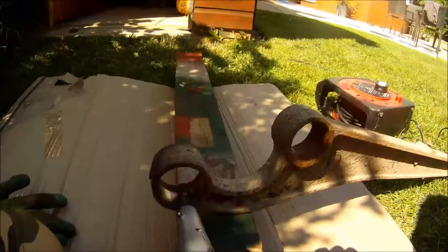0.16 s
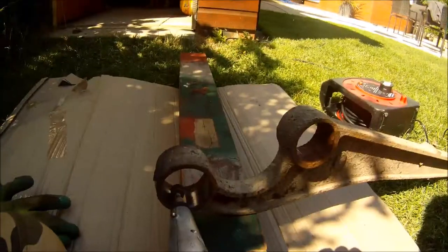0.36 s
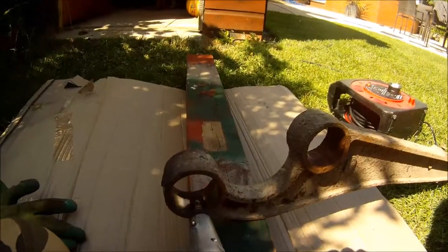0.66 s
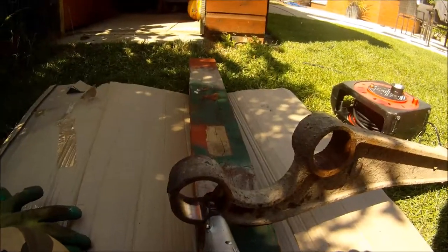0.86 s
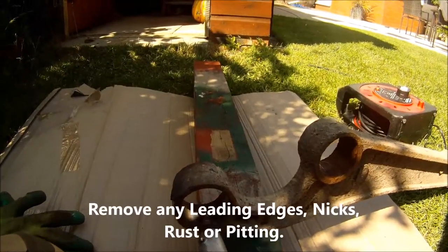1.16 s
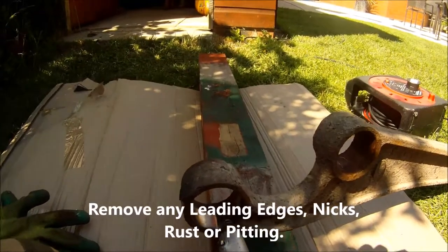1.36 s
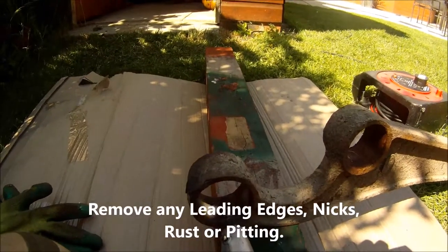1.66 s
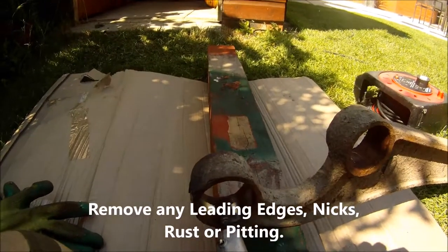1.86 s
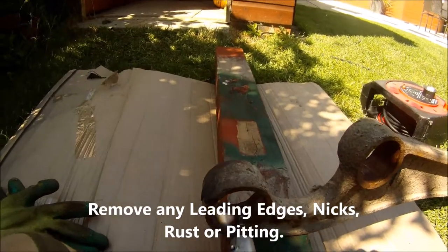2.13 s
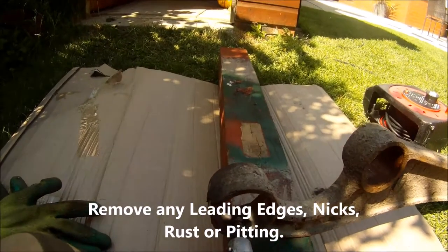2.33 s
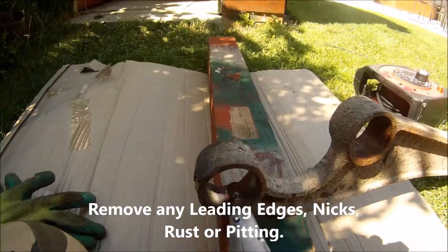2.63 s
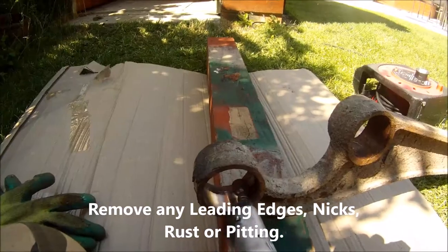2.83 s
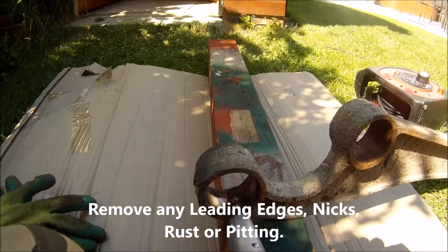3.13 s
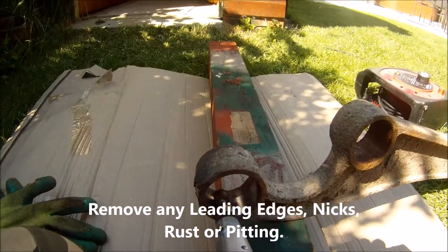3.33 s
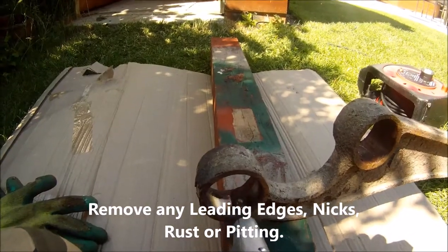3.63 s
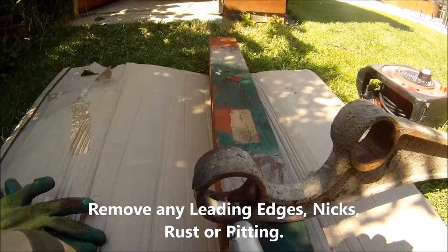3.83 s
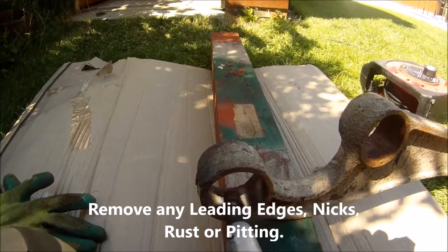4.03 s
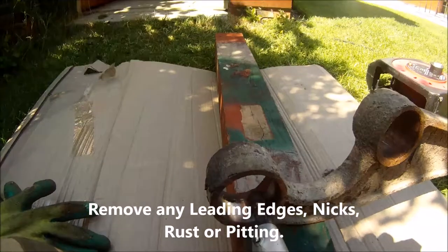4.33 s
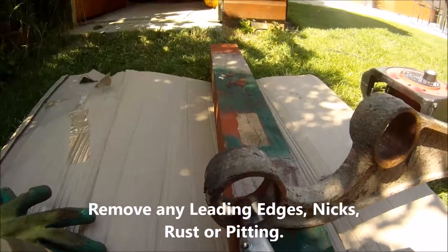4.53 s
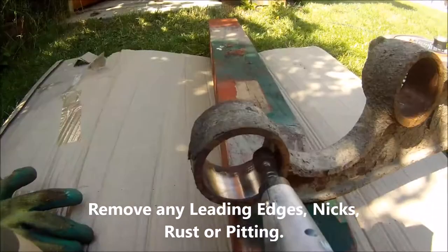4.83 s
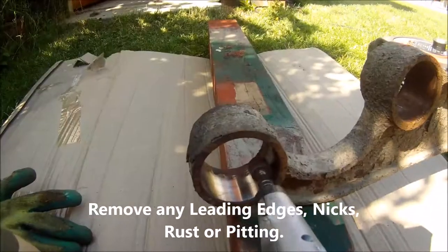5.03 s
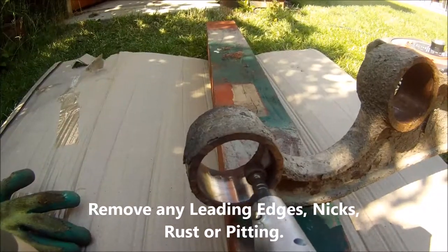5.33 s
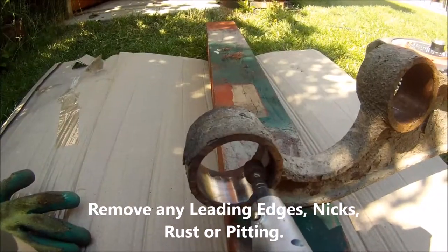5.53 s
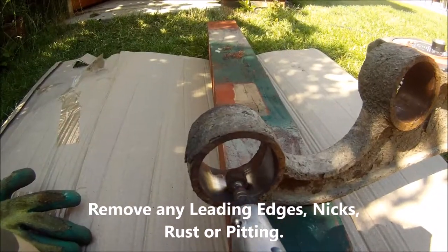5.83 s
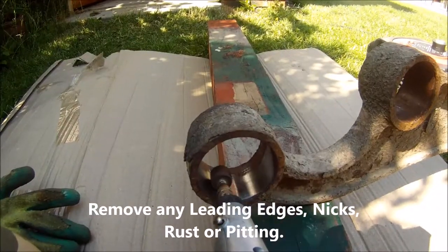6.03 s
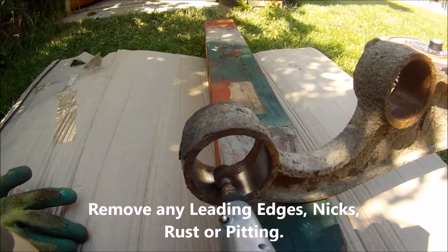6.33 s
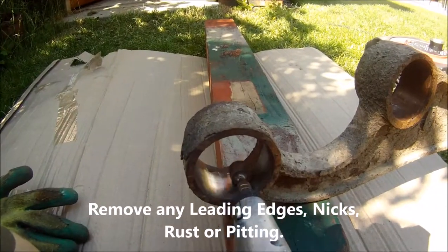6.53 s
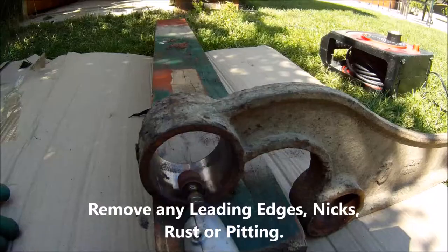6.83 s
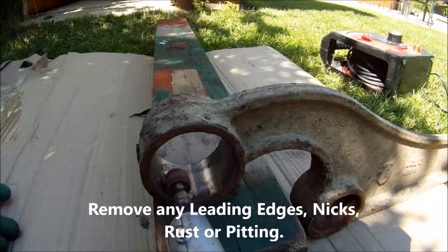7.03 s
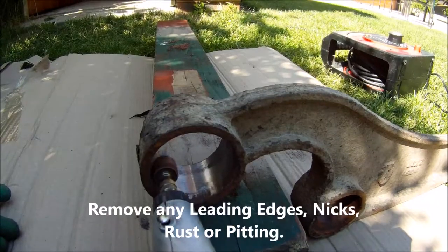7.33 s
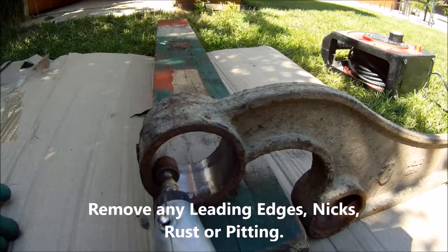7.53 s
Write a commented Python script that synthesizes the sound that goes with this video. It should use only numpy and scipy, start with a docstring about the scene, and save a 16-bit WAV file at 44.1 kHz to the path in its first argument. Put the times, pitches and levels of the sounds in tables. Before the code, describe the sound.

Outdoors, close to the microphone, an electric drill drives a small abrasive wheel inside a rusty steel bore. From the start it makes a rough, buzzing scrape with gritty hiss, its pitch sagging until about 1.2 s, then wavering upward by 1.9 s. Around 2.1-2.3 s it skips and knocks, sputters and lifts away, leaving faint yard wash and a tiny total dropout near 2.5 s. Grinding resumes at once, rasping and wavering, dipping low around 3.3 s and swelling near 4.4 s. At 4.75 s the sound shifts lower and duller with a wind thump, labouring to its lowest pitch near 5.7 s. Hard metallic knocks clatter from 5.7 to 6.1 s, then the rasp strengthens and rises. The casting and arm ring throughout these passes. After another brief dropout at 6.7 s, the wheel runs much quieter, higher and smoother to the end at about 7.7 s, under low wind buffets, strongest near 7.0 s.

```python
"""Outdoors, an electric drill spins a small abrasive wheel inside a rusty steel bore, with two short silences.
Each turn drags nearly the same rough rim over the steel; its high spot strikes once, and loose grit hisses.
Short knocks crack out, and the casting and its long arm ring as resonances. Noise shaped into wind buffets the
microphone over a faint yard wash. Samples held in steps mirror the spectrum into the treble."""
import sys
import numpy as np
from scipy.fft import rfft, irfft, next_fast_len
from scipy.io import wavfile
from scipy.ndimage import uniform_filter1d, map_coordinates

SR = 44100
rng = np.random.default_rng(int(sys.argv[2]) if len(sys.argv) > 2 else 0)


def materialize(psi):
    """Save the field psi as 16-bit PCM at rate SR to the path in sys.argv[1].

    A 1-D psi becomes a single channel; in a 2-D psi each row is a channel.
    """
    bounded = np.clip(np.atleast_2d(psi).T, -1, 1)
    quanta = np.round(bounded * 32767).astype(np.int16)
    wavfile.write(sys.argv[1], SR, quanta)


N = 338247
T = np.arange(N) / SR  # time in s


def amp(db):
    """dB to gain."""
    return 10 ** (np.asarray(db) / 20)


def unit(x):
    """x scaled to rms 1."""
    return x / np.sqrt(np.mean(x ** 2) + 1e-20)


def along(points, hz):
    """Read (hz, value) points on a log frequency axis."""
    f, v = np.transpose(points)
    return np.interp(np.log(hz + 1), np.log(f + 1), v)


def filtered(x, response):
    """Shape x by a complex response of frequency, padded so that tails do not wrap round."""
    m = next_fast_len(N + SR // 2)
    spectrum = rfft(x, m) * response(np.fft.rfftfreq(m, 1 / SR))
    return irfft(spectrum, m)[..., :N]


def causal(points):
    """A minimum-phase response along (hz, db) points: its sound starts only at the blow."""
    def response(hz):
        cepstrum = irfft(np.log(amp(along(points, hz)) + 1e-6))
        half = len(cepstrum) // 2
        cepstrum[1:half] *= 2
        cepstrum[half + 1:] = 0
        return np.exp(rfft(cepstrum))
    return response


def below(hz):
    """A steep zero-phase low-pass."""
    return lambda f: 1 / (1 + (f / hz) ** 10)


def mode(f, hz, width_hz):
    """A causal resonance of peak gain 1; the narrower it is, the longer it rings."""
    return 1j * f * width_hz / (hz * hz - f * f + 1j * f * width_hz)


def wobble(rate):
    """A smooth random curve, rate knots a second."""
    return map_coordinates(rng.standard_normal(int(N * rate / SR) + 4), [T * rate])


def rim(turns, spot, life_turns, uneven_db, size=160):
    """The rim's bumps, read by angle: one high spot, or force spread round the turn in a pattern that slowly wears."""
    whole = np.arange(int(turns[-1]) + 2)
    harmonics = size // 2 + 1
    knots = rng.standard_normal((2, int(200 * T[-1] / life_turns) + 4, harmonics))
    grid = np.meshgrid(whole / life_turns, np.arange(harmonics), indexing="ij")
    lag, strength = (map_coordinates(k, grid) for k in knots)  # per turn and harmonic
    # coarse shape and fine grain vary least
    strength = strength * np.interp(grid[1], [4, 12, 20, 32], [.3, 1, 1, .55])
    # harmonics in step make one high spot; scattered phases spread the force
    spread = 3 * (1 - np.interp(whole, turns, spot))
    bumps = -irfft(amp(uneven_db * strength) * np.exp(1j * spread[:, None] * lag), size)
    bumps = np.roll(bumps, size // 2, axis=1)
    return unit(map_coordinates(bumps, [turns - .5, turns % 1 * size], mode="grid-wrap"))


# wheel speed, sagging as it is pressed home, one curve per list: time_s, speed_turns_per_s
SPEED = [
    [(0.04, 137.7), (0.09, 136.8), (0.14, 131.4), (0.18, 130.8), (0.32, 124.5), (0.44, 128.3),
     (0.48, 128.1), (0.59, 132.1), (0.68, 128.4), (0.74, 128.2), (0.8, 124.9), (0.85, 124.3), (1.01, 118.4),
     (1.06, 120.3), (1.1, 119.9), (1.17, 112.7), (1.2, 111.3), (1.24, 111.6), (1.3, 118.4), (1.34, 121.2),
     (1.37, 120.8), (1.42, 117), (1.48, 115.4), (1.57, 119.2), (1.7, 117.7), (1.75, 118.9), (1.79, 122.4),
     (1.87, 134), (1.89, 134.4), (1.95, 132), (2.02, 137.1), (2.075, 138), (2.11, 131.4), (2.17, 134.2),
     (2.2, 131), (2.23, 137), (2.3, 138)],
    [(2.51, 127.3), (2.57, 124), (2.63, 113), (2.65, 110.1), (2.66, 110.9), (2.71, 122.4), (2.76, 119),
     (2.82, 118.4), (2.89, 114.2), (2.95, 117.2), (3.03, 114.3), (3.07, 114.8), (3.13, 112.8),
     (3.23, 104.6), (3.26, 97.2), (3.3, 93.5), (3.35, 94.4), (3.4, 93.5), (3.54, 100.5), (3.59, 107.1),
     (3.65, 112.9), (3.71, 115.1), (3.76, 115.4), (3.83, 113.4), (3.9, 116.9), (4.02, 113.2), (4.07, 108.9),
     (4.15, 105.9), (4.2, 107.6), (4.39, 121.7), (4.48, 117.7), (4.54, 116.1), (4.59, 117.9), (4.62, 117.3),
     (4.67, 114.6), (4.735, 113.4)],
    [(4.745, 101), (4.766, 98.9), (4.822, 102.3), (4.85, 102.8), (4.888, 100.6), (4.93, 96.6), (4.95, 95.5),
     (5.018, 105.1), (5.048, 105.2), (5.104, 101.9), (5.146, 101.9), (5.17, 101.1), (5.212, 94.3),
     (5.296, 99.3), (5.344, 97.9), (5.386, 94.5), (5.432, 94.1), (5.462, 92.2), (5.512, 87.6),
     (5.564, 87.7), (5.648, 88.6), (5.672, 86.6), (5.71, 81.6), (5.724, 81.1), (5.8, 85.5), (5.828, 88.2),
     (5.874, 91), (5.912, 96.4), (5.944, 99.4), (5.978, 100.9), (6.102, 98.4), (6.16, 99.2), (6.252, 103),
     (6.314, 106.6), (6.456, 106), (6.498, 103.1), (6.594, 99.5), (6.68, 99.4)],
]
# wheel speed under light pressure: time_s, speed_turns_per_s
SPEED_LIGHT = [(6.713, 163.5), (6.755, 159.2), (6.803, 151.2), (6.863, 155.1), (6.891, 153.6),
               (7.021, 152.2), (7.083, 157.6), (7.111, 158.5), (7.143, 157.4), (7.223, 163.0),
               (7.369, 151.4), (7.399, 151.7), (7.511, 143.0), (7.575, 146.9), (7.601, 145.5),
               (7.67, 151.4)]
# scouring in each of five stretches: time_s, level_db, then treble rasp_db, body_db and drone_db
# relative to that level, and high_spot_share (0-1)
SCOURING = [
    [(0.04, -32, -1.5, -0.5, -3.5, 0.78), (0.3, -29, -7, -6.5, -9.5, 0.66),
     (0.4, -30.5, -5, -3.5, -6, 0.79), (0.5, -28.5, -8, -10.5, -15, 0.48),
     (0.76, -25, -10.5, -9, -14, 0.55), (1.06, -27, -6.5, -10, -12.5, 0.62),
     (1.24, -27.5, -7, -15, -8, 0.63), (1.36, -29, -7, -6, -9, 0.69), (1.66, -25.5, -5.5, -11, -11, 0.7),
     (1.9, -30, -2.5, -1, -5, 0.72), (1.97, -30.5, -4.5, -4, -5, 0.57), (2.05, -31, -5, -12, -5, 0.4),
     (2.11, -26.5, -5.5, -13, -5, 0.66), (2.19, -30.5, -5.5, -11, -8, 0.72)],
    [(2.51, -25.5, -7.5, -6.5, -15, 0.57), (2.66, -25.5, -4, -14, -12, 0.66),
     (2.75, -26.5, -8, -7.5, -16, 0.24), (2.95, -26, -6.5, -9.5, -16, 0.65), (3.05, -33.5, 0, -4, -13, 0.6),
     (3.15, -31, -1.5, -6, -15, 0.61), (3.23, -30.5, -4.5, -8, -10.5, 0.6),
     (3.38, -30, -2, -10.5, -5.5, 0.7), (3.53, -28, 1, -8, -5.5, 0.85), (3.8, -26, -8.5, -8, -13.5, 0.69),
     (4.09, -29, -2, -5, -7, 0.72), (4.22, -26.5, -4.5, -6, -7, 0.83), (4.41, -24, -7, -7.5, -14, 0.79),
     (4.735, -26, -4, -8.5, -9, 0.75)],
    [(4.742, -28, -7, -7, -7.5, 0.67), (4.8, -30, -5, -5.5, -5, 0.65), (4.97, -31, -2.5, -2.5, -9, 0.63),
     (5.13, -29.5, -4, -4.5, -4.5, 0.43), (5.3, -31.5, -1.5, -2.5, -15.5, 0.55),
     (5.35, -28.5, -6, -6.5, -6.5, 0.61), (5.58, -31, -3.5, -3, -9, 0.76), (5.8, -28.5, -6.5, -4, -9, 0.86),
     (6.04, -26, -5, -11.5, -3.5, .82)],
    [(6.05, -28.5, -1, -11, -3, 0.93), (6.18, -26.5, 2, -19, -8, 1), (6.27, -29, -1, -4, -4, 0.71),
     (6.35, -26, -3.5, -8, -9.5, 0.78), (6.52, -26, -6, -9, -4, 0.77), (6.68, -28, -4, -8, -7, 0.82)],
    [(6.713, -34.5, -15, -8, -3, 1), (7.0, -36.5, -11, -5, 0.5, 0.88), (7.15, -37, -7.5, -5, -2, 0.88),
     (7.32, -38, -8.5, -5.5, -2, 0.85), (7.5, -38.5, -13, -5, -1, 0.85), (7.67, -35, -17, -5, -4.5, 0.87)],
]
# balance of each stretch: whine_db (relative to level), casting_ring_db
CONTACT = [(-10.5, -1.5), (-10.5, 0.5), (-12, -7), (-10.5, -1.5), (-3, -42)]
# the 2-3 kHz edge: time_s, edge_db (relative to level)
EDGE = [(0.04, -8), (0.3, -3.5), (0.65, -13.5), (0.88, -13), (1.1, -7), (1.7, -7), (1.9, -9.5), (2.2, -9.5),
        (2.58, -11), (2.9, -12.5), (3.1, -8), (3.4, -10), (4.2, -8.5), (4.72, -12.5), (5.0, -10.5),
        (5.5, -12), (6.1, -5.5), (6.35, -12.5), (6.55, -4.5), (6.72, -4.5), (7.67, -10)]
# roughness of each stretch at its top speed: rough (0-1)
ROUGH = [.04, .05, .11, .03, .03]
# the wheel skips: peak_s, added_rough (0-1), half_length_s (to 1/e)
JUDDERS = [(2.09, .15, .015), (2.15, .08, .05), (2.25, .55, .045), (5.85, .08, .1), (5.19, .07, .03),
           (5.72, .04, .1), (6.84, .07, .05), (7.05, .03, .02), (7.27, .05, .03), (7.37, .07, .025),
           (7.53, .04, .03)]
# scrape colour in the first bore, before the bands are levelled: pitch_hz, density_db (per Hz)
SCOUR = [(88, -38), (150, -16), (183, -30), (228, -10), (373, -16), (516, 0.5), (758, -17.5), (941, 1),
         (1190, -8.5), (1540, -0.5), (1910, -4.5), (2860, -5), (3550, -13.5), (4340, -3.5), (6000, -13),
         (7800, -62), (13200, -120)]
# scrape colour with the casting turned over: pitch_hz, density_db (per Hz)
WIDE_SCOUR = [(88, -38), (150, -15.5), (296, -12), (362, -18), (409, -5.5), (449, -3.5), (508, 1),
              (670, -19), (941, -7), (1210, -12.5), (1540, -3.5), (2200, -4), (3090, -16.5), (4340, -10),
              (6000, -27.5), (7800, -57), (13200, -120)]
# scrape colour under light pressure: pitch_hz, density_db (per Hz)
LIGHT_SCOUR = [(210, -57), (350, -15), (649, -24), (723, -13.5), (1210, 9.5), (1530, -3), (2080, -3.5),
               (2550, -13), (3010, -20), (4790, -22), (6000, -51), (7800, -92), (13200, -120)]
# the wheel is drawn off the steel, fades and leaves it
LIFT_S, LIFT_DB_PER_S, OFF_S = 2.213, 233, 2.335
RASP_LINGERS_DB_PER_S = 75  # the treble rasp sputters on as the wheel lifts
SAG_ROUGHENS = 1.8  # roughness grows with this power of top speed over speed
UNEVEN_DB = 4.2  # scales the random spread of the rim's harmonics
LATE_TURNS = .25  # how far the high spot moves back once the casting is turned over


def wheel():
    """Rim pattern and loose grit scrape the bore; returns the scrape, turns made, level and casting's share."""
    speed = np.interp(T, *np.vstack([*SPEED, SPEED_LIGHT]).T)
    speed = uniform_filter1d(speed, size=700)  # the rotor's inertia rounds every change
    rows = np.vstack(SCOURING)
    level_db, rasp_db, body_db, drone_db, spot = (np.interp(T, rows[:, 0], c) for c in rows.T[1:])
    spot = np.clip(spot, 0, 1)
    starts = [table[0][0] for table in SCOURING]
    stretch = np.maximum(np.searchsorted(starts, T) - 1, 0)
    whine_db, ring_db = np.transpose(CONTACT)[:, stretch]
    edge_db = np.interp(T, *np.transpose(EDGE))

    lifting = (T > LIFT_S) & (stretch == 0)
    level_db[lifting] = SCOURING[0][-1][1] - LIFT_DB_PER_S * (T[lifting] - LIFT_S)
    rasp_db[lifting] += (RASP_LINGERS_DB_PER_S * (T - LIFT_S) + 2 * wobble(120))[lifting]
    level = amp(level_db) * (T >= starts[0]) * ~(lifting & (T > OFF_S))

    top = np.array([speed[stretch == k].max() for k in range(len(starts))])[stretch]
    judder = sum(more * np.exp(-((T - s) / half) ** 2) for s, more, half in JUDDERS)
    rough = np.array(ROUGH)[stretch] * (top / speed) ** SAG_ROUGHENS
    rough = np.clip(rough + judder, 0, 1)

    turns = np.cumsum(speed * (1 + 0.019 * rough * wobble(60))) / SR
    turns += .045 * rough * wobble(45)  # the high spot lands early or late
    turns -= LATE_TURNS * np.clip((T - starts[2]) * 20, 0, 1)
    contact = np.exp(-2.5 * ((turns + 0.49) % 1))  # pressure peaks at the high spot and eases round the turn
    pattern = rim(turns, spot, life_turns=20, uneven_db=UNEVEN_DB)
    steady = (0.55 + contact) * pattern * amp(11.0 * rough * wobble(70))
    grit = (2.8 + contact) * rng.standard_normal(N)

    a, b, c, d = below(740), below(1300), below(1880), below(3000)
    # bands: response, level in dB, weight of loose grit (it counts more in the treble)
    bands = [
        (a, drone_db, .3),
        (lambda f: b(f) - a(f), whine_db, .4),
        (lambda f: c(f) - b(f), body_db, .6),
        (lambda f: d(f) - c(f), edge_db, 1.2),
        (lambda f: 1 - d(f), rasp_db, 3.2),
    ]
    out = np.zeros(N)
    for colour, first, last in [(SCOUR, 0, 1), (WIDE_SCOUR, 2, 3), (LIGHT_SCOUR, 4, 4)]:
        scrape = filtered([steady, grit], causal(colour))
        active = (stretch >= first) & (stretch <= last)
        for band, db, loose in bands:
            share = np.clip(loose * rough, 0, 1)
            firm, fine = (unit(v) for v in filtered(scrape, band))
            mix = np.sqrt(1 - share) * firm + np.sqrt(share) * fine
            out += active * level * amp(db) * mix
    return out, turns, level, amp(ring_db)


# short knocks: peak_s, level_db, ring_hz
KNOCKS = [(2.087, -13.5, 2150), (2.0948, -17, 1990), (2.185, -21, 1800), (2.2025, -22, 2000),
          (2.224, -27, 1600), (2.243, -35, 4300), (2.247, -27, 1800), (2.2705, -37, 4600),
          (2.2782, -24, 2120), (2.282, -36, 3280), (2.297, -41, 4500), (2.301, -39, 2780),
          (2.313, -30, 1490), (2.325, -35, 4600), (2.3283, -26, 2000), (5.734, -18, 1950),
          (5.747, -21, 1860), (5.758, -20, 1800), (5.7695, -18, 1920), (5.782, -18, 1800), (5.83, -19, 1810),
          (5.835, -15, 2010), (5.8462, -9, 2120), (5.858, -8.5, 2200), (5.8685, -25, 2100),
          (5.896, -18, 1710), (5.906, -18, 1810), (5.9115, -13, 2360), (5.922, -8, 2120), (5.961, -10, 2200),
          (5.972, -20, 2100), (6.0003, -15, 2100), (6.0115, -14, 2200), (6.0303, -19, 1680),
          (6.051, -19, 2200), (6.061, -18, 2220), (6.0924, -22, 2140)]
# colour of the knocks' grit: pitch_hz, level_db
SNAG_COLOUR = [(400, 1), (1200, 6), (2200, 0), (3200, 8), (4200, 6.5), (5600, -0.5)]
SNAG_RISE_S, SNAG_FALL_S, SNAG_GRIT = 0.00054, 0.00095, 0.5  # times to 1/e; grit gain before its colour


def strong_knocks():
    """Single knocks: a quick swell and fall of the rim's ring with a spray of grit."""
    lead = SR // 200
    tracks = np.zeros((2, N + SR))  # ring, grit
    t = np.arange(-lead, SR // 100) / SR
    shape = np.exp(-(t / np.where(t < 0, SNAG_RISE_S, SNAG_FALL_S)) ** 2)
    for s, db, hz in KNOCKS:
        ring = np.cos(2 * np.pi * (hz * t + rng.random()))
        grit = SNAG_GRIT * rng.standard_normal(len(t))
        start = round(s * SR) - lead
        tracks[:, start:start + len(t)] += amp(db) * shape * np.array([ring, grit])
    return tracks[0, :N] + filtered(tracks[1, :N], causal(SNAG_COLOUR))


# casting modes, sung when a harmonic of the wheel passes: pitch_hz, width_hz, level_db
CASTING = [(413.5, 4.4, 15), (495, 4.7, -4), (1591, 73, -2), (2104, 46, 0.5), (2875, 50, 0), (4176, 31, 4),
           (4443, 64, -1)]
CASTING_KNOCK_DB = -10  # a knock's share in the casting
CASTING_SHIFT_DB = 2  # scales each mode's random swell as the wheel wanders


def casting(x):
    """The steel casting rings on at a few modes."""
    out = np.zeros(N)
    for hz, width_hz, db in CASTING:
        push = x * amp(db + CASTING_SHIFT_DB * wobble(7))
        out += filtered(push, lambda f: mode(f, hz, width_hz))
    return out


# wheel harmonics that shake the arm: multiple, level_db (relative)
ARM_ORDERS = [(7, 2), (8, 7), (9, 4), (10, 15), (11, 4)]
# how much of the wheel's shake reaches the arm: time_s, gain_db
ARM_DRIVE = [(0.04, 0), (0.2, -6), (0.4, 9), (0.6, -13), (0.75, 9), (0.9, -1), (1.0, -6), (1.25, -10),
             (1.4, 6.5), (1.6, 10.5), (1.8, -1), (2.0, -8), (2.05, 10.5), (2.12, 12), (2.2, 12.5),
             (2.28, 8), (2.4, 0), (2.6, -2), (2.8, -6), (3.1, -10), (3.3, -20), (3.6, 3.5), (3.9, -2),
             (4.2, 3), (4.45, -4), (4.65, -13), (4.8, -17), (5.3, -14), (5.5, 2), (5.7, -8), (5.95, 3),
             (6.15, -10), (6.3, 12), (6.4, 5), (6.68, -18)]
ARM_HZ, ARM_WIDTH_HZ = 965, 3.2  # its bell-like mode
ARM_KNOCK_DB = 21  # how hard a knock shakes it


def arm(turns, force, knocks):
    """The long arm sings when a harmonic of the wheel passes its mode or a knock shakes it, and rings on."""
    shake = sum(amp(db) * np.sin(2 * np.pi * k * turns) for k, db in ARM_ORDERS)
    shake = shake * force * amp(np.interp(T, *np.transpose(ARM_DRIVE)))
    return filtered(shake + amp(ARM_KNOCK_DB) * knocks, lambda f: mode(f, ARM_HZ, ARM_WIDTH_HZ))


# wind colour on the microphone, before levelling: pitch_hz, density_db (per Hz)
BUFFET = [(12, -25), (20, -5.5), (65, 0.5), (173, -12), (232, -22), (258, -20.5), (330, -28), (430, -67),
          (730, -120)]
# gusts: peak_s, level_db, half_length_s (to 1/e)
GUSTS = [(4.775, -30, 0.025), (4.812, -27, 0.019), (4.843, -36, 0.018), (4.95, -56, 0.06),
         (5.077, -48, .03), (5.497, -53, .1), (5.68, -57, 0.072), (6.316, -55, 0.19), (6.75, -35.5, 0.05),
         (6.898, -34, 0.045), (6.987, -28, .022), (7.027, -20.5, .016), (7.058, -21, .014),
         (7.14, -30, 0.049), (7.238, -29, 0.028), (7.286, -29, 0.017), (7.357, -35, .02), (7.4, -38, 0.016),
         (7.46, -35, .025), (7.63, -47, 0.087)]
BREEZE_DB, BREEZE_SWING_DB = -53, 2.5  # centre level; scale of its random swing


def wind():
    """Lumpy low noise: air buffets the microphone in a breeze with gusts."""
    buffet = filtered(rng.standard_normal(N), lambda hz: amp(along(BUFFET, hz)))
    breeze = amp(BREEZE_DB + BREEZE_SWING_DB * wobble(14))
    gusts = sum(amp(db) * np.exp(-((T - s) / half) ** 2) for s, db, half in GUSTS)
    return (breeze + gusts) * unit(buffet * amp(1.9 * wobble(24)))


# wash of the yard, before levelling: pitch_hz, density_db (per Hz)
YARD = [(88, 0), (150, 2), (415, -2.5), (650, -1.5), (971, -0.5), (1100, -12), (3500, -9.5), (6000, -17.5),
        (7800, -64), (13200, -120)]
YARD_DB = -54


def yard():
    """The faint wash of the yard: steady coloured noise."""
    return amp(YARD_DB) * unit(filtered(rng.standard_normal(N), lambda hz: amp(along(YARD, hz))))


def scene():
    """Wheel and knocks, the casting and arm that they ring, and the air."""
    scrape, turns, level, ring = wheel()
    knocks = strong_knocks()
    body = casting(ring * scrape + amp(CASTING_KNOCK_DB) * knocks)
    long_arm = arm(turns, ring * level, knocks)
    return (scrape + knocks + body + long_arm + wind() + yard())[None]


# the sound breaks off: start_s, end_s
SILENCES = [(2.475, 2.507), (6.681, 6.713)]
STEP_HZ, TOP_HZ = 12000, 15700  # rate of the held samples; upper limit of the output


def record(dry):
    """Held samples mirror the band around the step rate and droop as a sinc; the sound breaks off for the silences."""
    def band_limit(hz):
        droop = np.sinc(np.minimum(hz / STEP_HZ, .5))  # undone here for the band below the mirror
        return 1 / (1 + (hz / 5750) ** 30) / droop

    band = filtered(dry, band_limit)
    mirrored = band * (1 + 2 * np.cos(2 * np.pi * STEP_HZ * T))
    on = 1 - sum((T > a) & (T < b) for a, b in SILENCES)
    return filtered(mirrored * on, lambda hz: np.sinc(hz / STEP_HZ) * (hz < TOP_HZ))


dry = scene()
out = record(dry)
materialize(out)
```